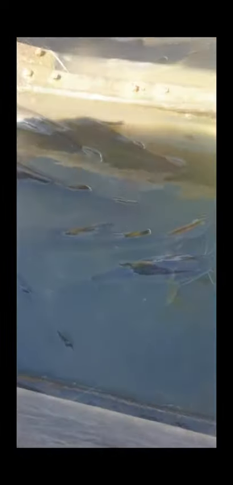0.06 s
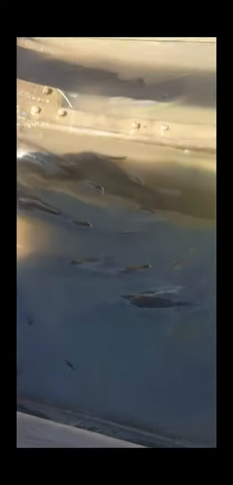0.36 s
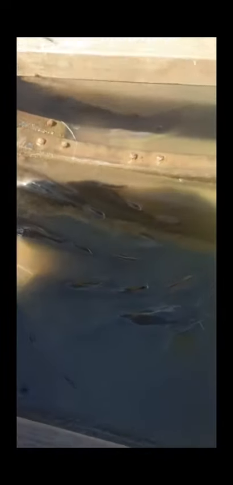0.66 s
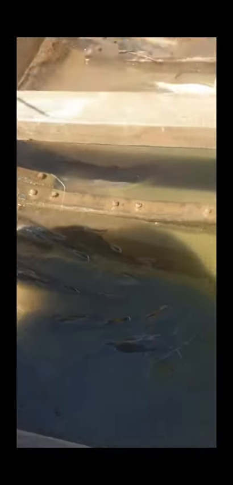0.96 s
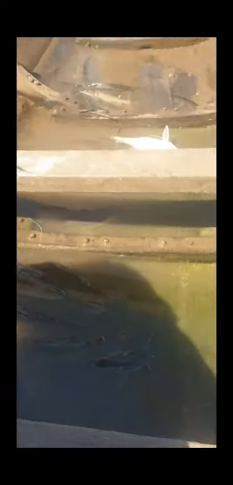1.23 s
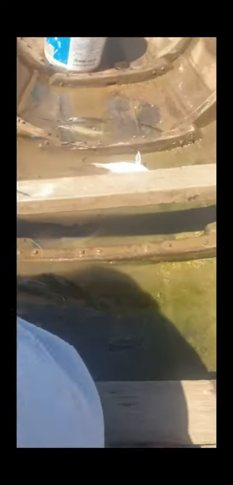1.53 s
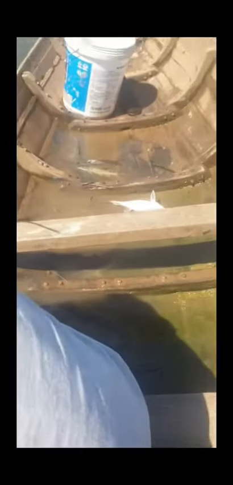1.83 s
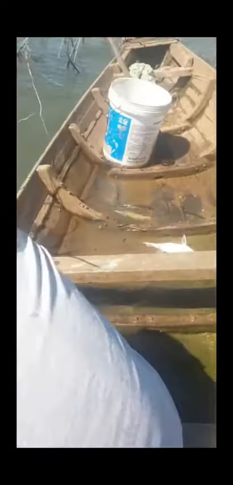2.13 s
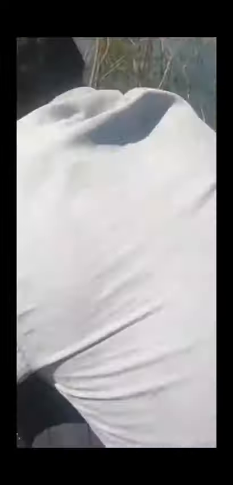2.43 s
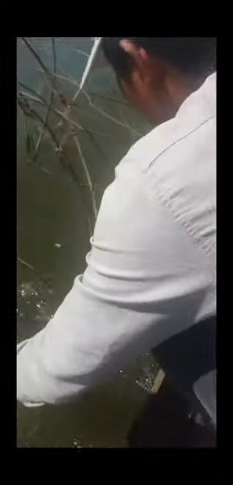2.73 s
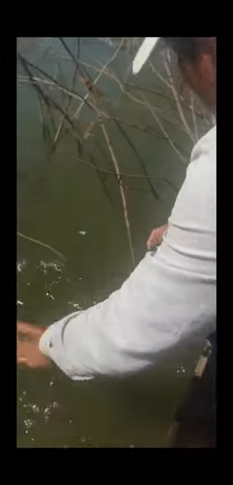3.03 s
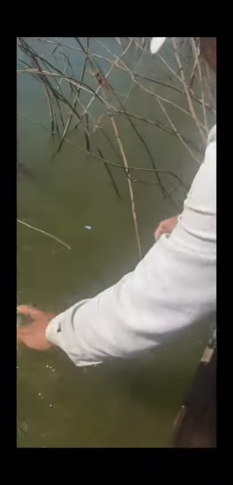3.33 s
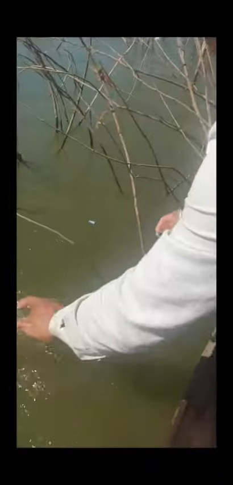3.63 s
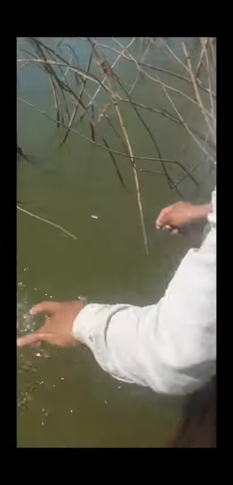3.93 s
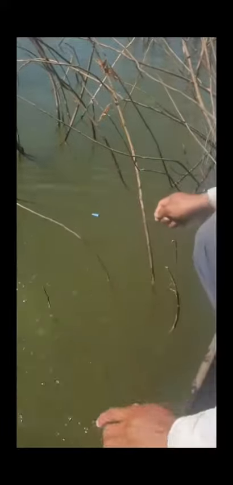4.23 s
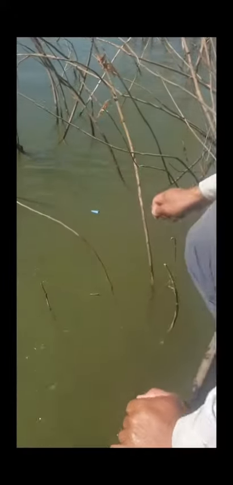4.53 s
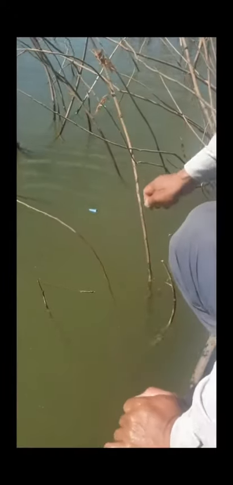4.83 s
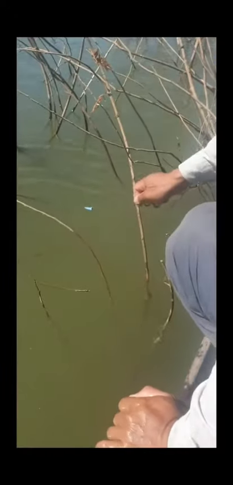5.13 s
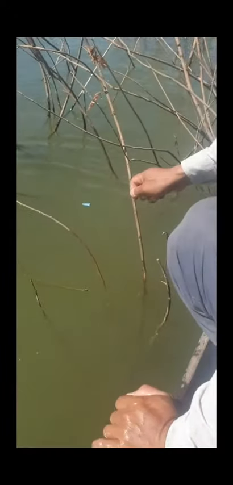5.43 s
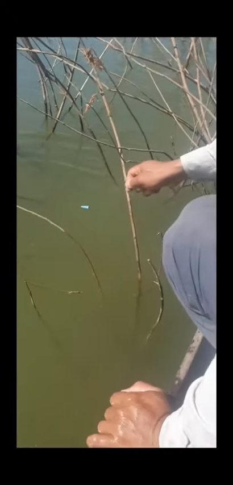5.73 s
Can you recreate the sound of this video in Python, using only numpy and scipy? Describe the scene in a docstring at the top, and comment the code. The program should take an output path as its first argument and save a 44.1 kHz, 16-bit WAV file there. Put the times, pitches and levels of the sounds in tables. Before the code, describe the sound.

Light wind rumbles on a phone microphone throughout, outdoors on a calm lake, with a few brief gusts, strongest around 3 seconds. From about 0.5 seconds water sloshes in the flooded bottom of a wooden boat, gurgling and bubbling with small splashes and a few dry ticks, then easing off by 2.3 seconds. From 2.4 to 3.6 seconds a bare hand slaps the lake surface six times, evenly, about four times a second. These are the loudest sounds, each a sharp wet smack with a hollow plop and a little spray. The churned water soon calms, and small splashes and single bubbles follow. From about 4.5 seconds water trickles faintly back, with a light tick and the soft brush of a sleeve. Scattered quiet drips and plops continue under the wind until nearly 6 seconds.

```python
"""A light wind rumbles on a phone microphone throughout. From 0.5 s water sloshes in the flooded well
of a wooden boat: swarms of ringing bubbles, small splashes, dry ticks. From 2.4 to 3.6 s a bare hand
slaps the lake beside it six times: each a push, a wet smack, a ringing air pocket and spray, leaving
churned water that soon calms. Small splashes and bubbles follow; from 4.5 s water trickles back
and a sleeve brushes past."""
import sys
import numpy as np
from scipy import signal
from scipy.fft import rfft, irfft
from scipy.io import wavfile

SR = 44100
rng = np.random.default_rng(int(sys.argv[2]) if len(sys.argv) > 2 else 0)


def unload_audio(sound):
    """Save the sound as a 16-bit wav file, at the path given as the first command line argument."""
    columns = np.transpose(np.atleast_2d(sound))
    # keep every value between -1 and 1, then stretch to whole-number steps
    steps = np.round(np.clip(columns, -1, 1) * 32767)
    wavfile.write(sys.argv[1], SR, steps.astype(np.int16))


N = 258867

# hand slaps: t/s, contact/s, air pocket/Hz, pocket/dB, push/dB, smack/Hz, smack/dB, spray/dB,
# spray ring/Hz, ring/dB, churn/dB
SLAPS = [(2.4395, 0.004, 230.6, -26, -21.5, 1746, -20.5, -38, 3650, -40, -53.5),
         (2.6684, 0.0029, 285, -24.5, -18, 1730, -16, -35.5, 4690, -25, -55.5),
         (2.9108, 0.003, 266, -25.5, -17, 1657, -17, -29.5, 3480, -33, -56.5),
         (3.143, 0.0061, 211.5, -26.5, -25.5, 1844, -20.5, -27, 4370, -34.5, -58.5),
         (3.363, 0.0078, 223, -33, -32.5, 1707, -18, -31.5, 2540, -26.5, -58),
         (3.5928, 0.0018, 256, -23.5, -35.5, 1620, -19, -38.5, 3550, -40, -64)]
# small splashes: t/s, smack decay/s, plop/dB, smack/Hz, smack/dB, spray/dB
SPLASHES = [(0.579, .006, -52, 1740, -49, -66), (.672, .009, -68, 1640, -47.5, -63),
            (0.722, .014, -63, 1420, -38, -51.5), (0.747, 0.011, -40, 1540, -44.5, -68),
            (.809, 0.022, -37, 1260, -44, -65), (0.918, 0.0054, -31.5, 1730, -42, -48.5),
            (1.016, 0.0019, -38, 2180, -57, -56), (1.09, .005, -33, 2020, -48, -49.5),
            (1.163, 0.011, -39.5, 1980, -43.5, -56), (1.217, 0.0081, -35.5, 2180, -44.5, -53),
            (1.39, .008, -44, 2140, -51, -53), (1.462, .016, -39, 2000, -42.5, -55),
            (1.542, 0.0054, -37, 1750, -39, -42), (1.678, 0.0062, -48, 2170, -63, -41),
            (1.749, .005, -37, 2120, -54, -59), (1.774, .01, -36.5, 2570, -39.5, -50),
            (1.828, 0.0046, -56, 2360, -44.5, -42), (1.908, 0.0036, -55, 2000, -58, -42.5),
            (1.989, 0.0043, -30, 1340, -65, -44), (2.053, 0.02, -36.5, 2120, -64, -38.5),
            (2.202, 0.018, -43, 1020, -38, -66), (2.801, .0065, -55.5, 1810, -55.5, -54),
            (2.832, .005, -52.5, 1480, -51, -58.5), (3.058, 0.0031, -64, 1630, -40, -51),
            (3.126, 0.0053, -41.5, 1800, -41.5, -51.5), (3.339, .003, -58.5, 2080, -48.5, -68.5),
            (3.429, .0057, -35.5, 1650, -41, -48), (3.502, 0.032, -53.5, 1384, -46.5, -72.5),
            (3.634, 0.0039, -43.5, 1735, -32, -58), (3.695, 0.013, -44.5, 1585, -40.5, -51.5),
            (3.972, 0.015, -55, 1800, -53.5, -57.5), (4.236, .012, -50.5, 1810, -54.5, -59.5),
            (4.727, 0.017, -51.5, 1570, -52, -73), (4.8, 0.0029, -45, 1790, -53, -63),
            (4.863, .0097, -53, 1780, -54, -80), (5.245, 0.011, -44, 1700, -45.5, -59),
            (5.518, 0.01, -48, 1790, -47.5, -55.5), (5.81, 0.013, -43, 1654, -45, -56)]
# single bubbles and drips: t/s, starting f/Hz, level/dB
BUBBLES = [(.806, 883, -38.5), (1.080, 857, -32.5), (2.474, 2020, -45), (2.693, 1730, -40.5),
           (3.64, 860, -41), (3.851, 1060, -58), (3.974, 284, -45.5), (4.277, 199, -46), (4.30, 297, -46),
           (4.33, 754, -56), (4.405, 614, -53), (4.505, 665, -54.5), (4.648, 670, -48.5), (4.752, 650, -51),
           (4.864, 302, -47), (4.937, 300, -41), (4.938, 710, -50), (5.325, 326, -55), (5.37, 694, -55.5)]
# slosh in the boat: t/s, gurgle/dB, patter/dB, fizz/dB
SLOSH = [(0.5, -73, -73.1, -71.3), (0.6, -61.5, -56.5, -62.5), (0.76, -49.5, -45.5, -58.5),
         (1.02, -39.5, -50, -55), (1.3, -41, -46.5, -52), (1.43, -45, -52, -59.5), (1.6, -40, -43, -53.5),
         (1.87, -41.5, -48, -55), (2.149, -42.5, -46, -52.5), (2.33, -57.5, -58, -60)]
# water trickling back: start/s, end/s, gurgle/dB, patter/dB, fizz/dB
TRICKLES = [(4.482, 4.58, -60, -67.5, -72), (4.73, 4.942, -58.5, -66.5, -72)]
# offsets to a slap's churn level: gurgle/dB, patter/dB, fizz/dB
CHURN_OFFSET_DB = [2, 1.5, -6.5]
# calming of stirred water: gurgle/(dB/s), patter/(dB/s), fizz/(dB/s)
SETTLE_DB_PER_S = [46, 43, 21.5]
# calm lake: gurgle/dB, patter/dB, fizz/dB
LAPPING_DB = [-74, -79, -82.5]
# dry ticks: t/s, f/Hz, width/Hz, level/dB
TICKS = [(1.016, 800, 900, -41.5), (1.217, 700, 900, -46), (1.542, 1750, 700, -40.5),
         (1.913, 7000, 5040, -48.5), (1.988, 880, 910, -41.5), (2.798, 5050, 1100, -47.5),
         (4.019, 700, 900, -58), (4.4745, 1540, 1110, -45.5), (4.480, 1400, 896, -47),
         (5.455, 4230, 4010, -75.5), (5.69, 4940, 4100, -77)]
# sleeve strokes: t/s, decay/s, f/Hz, level/dB
SWISHES = [(4.518, .012, 6300, -59), (4.534, 0.0037, 5900, -55), (4.545, 0.0027, 5600, -54),
           (4.565, 0.027, 5100, -59.5), (4.834, 0.0015, 5170, -66)]
# wind on the microphone: t/s, level/dB
WIND = [(0, -50), (0.18, -46), (0.52, -54.1), (0.68, -50.5), (0.87, -51), (1.4, -44.5), (1.55, -49),
        (1.85, -46), (2.28, -57.5), (2.5, -52), (2.92, -40.5), (3.27, -56.5), (3.4, -45), (3.85, -57.5),
        (4.15, -52), (4.95, -50), (5.38, -52.5), (5.87, -47.5)]
# gusts: t/s, f/Hz, half length/s, level/dB
BUFFETS = [(.69, 69.5, 0.028, -36.5), (2.818, 102, 0.019, -41), (2.955, 130, 0.02, -29),
           (2.958, 54, 0.045, -28), (2.992, 136.5, 0.028, -29.5), (3.371, 133, .007, -31.5),
           (3.385, 95, .016, -32.5), (3.442, 99, 0.023, -40), (4.906, 106, .0094, -34),
           (5.151, 72.7, 0.024, -37.5), (5.777, 128.6, 0.0059, -35), (5.845, 83.6, 0.023, -38)]
# spectra of push, spray, plop, slosh and wind: f/Hz, relative density/dB
PUSH_SPECTRUM = [(150, -32.5), (230, -17), (320, -1.5), (450, 3), (640, 3.5), (800, -3), (980, -9),
                 (1300, -4.5), (1800, -26.5)]
SPRAY_SPECTRUM = [(1500, -38), (2400, 2), (3000, -15), (3700, 1.5), (4900, -2), (5800, -7), (7500, -6.5),
                  (9800, -13.5)]
PLOP_SPECTRUM = [(150, -16.5), (300, 6), (500, -6), (780, 3.5), (950, -2.5), (1150, -23), (1500, -28.5)]
SLOSH_SPECTRUM = [(150, -11.5), (230, -1), (400, 2.5), (530, -0.5), (700, -2.5), (880, -8), (1150, -17.5),
                  (1600, -22), (2100, -19), (3000, -23), (3500, -23.5), (4500, -20), (6000, -21),
                  (7000, -27), (10000, -29)]
WIND_SPECTRUM = [(20, -15.5), (32, -10), (50, -2.5), (80, -0.5), (115, -6.5), (160, -13.5), (220, -19),
                 (320, -25.5), (600, -34)]
# open-air tail: f/Hz, T60/s
TAIL_T60 = [(200, 0.12), (1000, 0.086), (3000, 0.083), (9000, 0.12)]


def slaps():
    """The palm pushes the surface, squeezes out air, leaves a ringing pocket and throws spray."""
    out, lead_s = np.zeros(N), .02
    t = np.arange(8192) / SR - lead_s
    for (at_s, contact_s, pocket_hz, pocket_db, push_db, smack_hz, smack_db,
         spray_db, ring_hz, ring_db, _) in SLAPS:
        blow = -np.exp(-(t / .0001) ** 2)  # the flat hand lands at once
        shove = burst(t, .0016, 4 * contact_s)
        push = shaped(at_level(blow, 0) + at_level(shove, -.8), PUSH_SPECTRUM)
        crack = at_level(resonate(blow, smack_hz, 800), -15) + at_level(smack(t, smack_hz, contact_s), 0)
        drops = slap_spray(t, contact_s)
        ring = resonate(burst(t, .0014, contact_s), ring_hz, 610, 900)
        impact = at_level(push, push_db) + at_level(crack, smack_db)
        add(out, at_s - lead_s, impact + at_level(drops, spray_db) + at_level(ring, ring_db))
        add(out, at_s, at_level(bubble(pocket_hz, rise_oct=.087, cycles=3), pocket_db))
    return out


def slap_spray(t, contact_s):
    """A sheet of water tears and closes again; the fingers shed tiny bubbles."""
    tear = burst(t, .0017, 1.4 * contact_s)
    close = gain(-24) * burst(t - .022, .0042, .0035)
    grain = gain(2.5 * rng.standard_normal(len(t)))
    out = at_level(shaped((tear + close) * grain, SPRAY_SPECTRUM), 0)
    for hz, delay_s, cycles in rng.uniform([2000, 0, 8], [6500, .03, 22], (10, 3)):
        add(out, delay_s - t[0], at_level(bubble(hz, .0032, cycles), -13 - 300 * delay_s))
    return out


def smack(t, hz, decay_s):
    """Air squeezed from the closing gap rings in a broad resonance and a weaker one on each side."""
    rise_s = min(.4 * decay_s, .0015)  # short contacts crack sharply
    puff = burst(t + .0002, rise_s, decay_s)  # just before the surfaces meet
    centre = resonate(puff, hz, 210, 650)
    below = resonate(puff, .76 * hz, 300, 820)
    above = resonate(puff, 1.22 * hz, 210, 900)
    return at_level(centre, 0) + at_level(below, -14.5) + at_level(above, -9.5)


def bubble(hz, rise_oct, cycles):
    """Trapped air rings, rising in pitch near the surface; rise_oct and cycles are per decay time."""
    decay_s = cycles / hz
    age = np.arange(int(6 * decay_s * SR)) / SR / decay_s
    turns = np.cumsum(hz * 2 ** (rise_oct * age)) / SR
    return np.sin(2 * np.pi * turns) * np.exp(-age) * (1 - np.exp(-age / .28))


def splashes():
    """Falling water and wavelets: soft plop, smack, short sizzle; single bubbles ring."""
    out, lead_s = np.zeros(N), .02
    t = np.arange(8192) / SR - lead_s
    for at_s, decay_s, plop_db, smack_hz, smack_db, spray_db in SPLASHES:
        plop = at_level(shaped(burst(t, .00047, .89 * decay_s), PLOP_SPECTRUM), plop_db)
        spray = at_level(shaped(burst(t, .0025, 3 * decay_s), SPRAY_SPECTRUM), spray_db)
        add(out, at_s - lead_s, plop + at_level(smack(t, smack_hz, decay_s), smack_db) + spray)
    for at_s, hz, db in BUBBLES:
        rise_oct = .11 * (300 / hz) ** .7  # big bubbles glide further
        add(out, at_s, at_level(bubble(hz, rise_oct, cycles=4.2), db))
    return out


def water():
    """Large bubbles gurgle, drops patter, fine foam fizzes."""
    gurgle, patter, fizz = stirring()
    glug = gurgle * (gurgle / gain(-36.5)) ** .52  # only a hard slosh traps the biggest bubbles
    return (glug * swarm(190, 500, per_s=150, cycles=4.9, spread_db=.5, wash_db=-15, clump_db=5.5)
            + gurgle * swarm(540, 1120, per_s=240, cycles=3.7, spread_db=2.5, wash_db=-14, clump_db=2.5)
            + patter * swarm(1200, 3500, per_s=600, cycles=12, spread_db=2.5, wash_db=-2.5, clump_db=2)
            + fizz * swarm(3500, 10000, per_s=2500, cycles=12, spread_db=5, wash_db=0, clump_db=2))


def stirring():
    """Gurgle, patter and fizz gains: calm lake, slosh, slap churn and trickles add in power."""
    layers = []
    for k, slosh in enumerate(gain_curves(SLOSH)):
        settle = SETTLE_DB_PER_S[k]
        parts = [gain(LAPPING_DB[k]), slosh * held(SLOSH[0][0], SLOSH[-1][0], settle, settle)]
        for at_s, *_, churn_db in SLAPS:
            parts.append(gain(churn_db + CHURN_OFFSET_DB[k]) * held(at_s, at_s, 400, settle))
        for start_s, end_s, *db in TRICKLES:
            parts.append(gain(db[k]) * held(start_s, end_s, rise_db_per_s=71, fall_db_per_s=93))
        layers.append(np.sqrt(sum(part ** 2 for part in parts)))
    return layers


def swarm(lo_hz, hi_hz, per_s, cycles, spread_db, wash_db, clump_db):
    """Bubbles of one size range over a wash of turbulence, swelling in clumps."""
    clumps = gain(clump_db * np.tanh(band_noise(11, 23)))
    bubbles, pitches_hz = np.zeros(N), np.geomspace(lo_hz, hi_hz, 40)
    for hz in pitches_hz:
        share = hz / pitches_hz.sum()  # small bubbles are the most numerous
        births = (rng.random(N) < per_s * share / SR) * rng.choice([-1, 1], N)
        strengths = gain(spread_db * np.minimum(rng.exponential(1, N), 3))
        detune = rng.uniform(.93, 1.03)
        ring = bubble(hz * detune, rng.uniform(0, .08), cycles * detune * rng.uniform(.28, 2.9))
        bubbles += signal.oaconvolve(births * strengths, at_level(ring, 0))[:N]
    wash = gain(wash_db) * band_noise(lo_hz, hi_hz)
    return unit_rms(shaped((unit_rms(bubbles) + wash) * clumps, SLOSH_SPECTRUM))


def ticks():
    """An impulse rings one broad, quickly dying resonance."""
    out, impulse = np.zeros(N), signal.unit_impulse(2048)
    for at_s, hz, width_hz, db in TICKS:
        ring = resonate(impulse, hz, width_hz, 2 * width_hz)
        add(out, at_s, at_level(bandpass(ring, 450, 10000), db))
    return out


def sleeve():
    """Cloth brushes in short bright strokes."""
    out, lead_s = np.zeros(N), .04
    t = np.arange(8192) / SR - lead_s
    for at_s, decay_s, hz, db in SWISHES:
        stroke = resonate(burst(t, .68 * decay_s, decay_s), hz, 1200)
        add(out, at_s - lead_s, at_level(stroke, db))
    return out


def wind():
    """Lumpy rumble on the microphone; sharper buffets break up into turbulence."""
    lumps = gain(2 * np.tanh(band_noise(4, 46)))
    out = gain_curves(WIND)[0] * unit_rms(shaped(rng.standard_normal(N) * lumps, WIND_SPECTRUM))
    for at_s, hz, half_s, db in BUFFETS:
        t = np.arange(-3 * half_s, 3 * half_s, 1 / SR)
        eddy = np.cos(2 * np.pi * (hz * t * (1 - .047 * t / half_s) + rng.random()))
        turbulence = gain(-8.5) * band_noise(.83 * hz, 2.1 * hz, SR)[-len(t):]
        add(out, at_s + t[0], at_level((eddy + turbulence) * np.exp(-(t / half_s) ** 2), db))
    return out


def outdoors(x):
    """Adds a thin scattered tail and one faint nearby echo."""
    taps = rng.standard_normal(SR // 2) * (rng.random(SR // 2) < .1)
    hz, t, spectra = signal.stft(taps, SR, nperseg=256)
    fade = gain(-60 * t / log_interp(TAIL_T60, hz)[:, None])
    _, tail = signal.istft(spectra * fade, SR, nperseg=256)
    out = x + gain(-22) * signal.fftconvolve(x, tail / np.linalg.norm(tail))[:N]
    add(out, .025, gain(-23.5) * bandpass(x, 1900, 6500))
    return out


def gain(db):
    return 10 ** (np.asarray(db) / 20)


def unit_rms(x):
    return x / np.sqrt(np.mean(x ** 2) + 1e-20)


def at_level(x, db):
    """Scales to the energy of 10 ms at this level."""
    return gain(db) * x / np.sqrt(np.sum(x ** 2) / (SR / 100) + 1e-20)


def log_interp(table, hz):
    table_hz, values = np.transpose(table)
    return np.interp(np.log(hz + 1), np.log(table_hz + 1), values)


def gain_curves(table):
    """One curve per dB column."""
    times_s, *columns_db = np.transpose(table)
    return [gain(np.interp(np.arange(N) / SR, times_s, db)) for db in columns_db]


def held(start_s, end_s, rise_db_per_s, fall_db_per_s):
    """Envelope: swells to start_s, holds to end_s, dies away."""
    t = np.arange(N) / SR
    return gain(-rise_db_per_s * np.maximum(start_s - t, 0) - fall_db_per_s * np.maximum(t - end_s, 0))


def add(mix, at_s, sound):
    part = mix[max(round(at_s * SR), 0):][:len(sound)]
    part += sound[:len(part)]


def shaped(x, spectrum):
    """Filters by a spectrum, 24 dB/octave roll-off beyond its ends."""
    hz = np.fft.rfftfreq(len(x), 1 / SR) + 1
    skirts = np.minimum(1, np.minimum(hz / spectrum[0][0], spectrum[-1][0] / hz)) ** 4
    return irfft(rfft(x) * gain(log_interp(spectrum, hz)) * skirts, len(x))


def bandpass(x, lo_hz, hi_hz):
    return signal.sosfilt(signal.butter(3, [lo_hz, hi_hz], "band", fs=SR, output="sos"), x)


def band_noise(lo_hz, hi_hz, samples=N):
    return unit_rms(bandpass(rng.standard_normal(samples), lo_hz, hi_hz))


def resonate(x, hz, *widths_hz):
    """Two-pole resonances in series, one per width."""
    for width_hz in widths_hz:
        x = signal.lfilter(*signal.iirpeak(hz, hz / width_hz, SR), x)
    return x


def burst(t, rise_s, decay_s):
    """Noise peaking at t = 0."""
    return rng.standard_normal(len(t)) * np.exp(np.minimum(t / rise_s, -t / decay_s))


def scene():
    """Mono mix; only slaps, splashes and ticks echo."""
    return (outdoors(slaps() + splashes() + ticks()) + water() + sleeve() + wind())[None]


def record(dry):
    """The highest peaks are rounded off softly, and the phone limits the band."""
    ceiling, cutoff_hz = .93, 10150
    limited = dry / (1 + (dry / ceiling) ** 8) ** (1 / 8)
    lowpass = signal.firwin(255, cutoff_hz, window=("kaiser", 7), fs=SR)
    return signal.oaconvolve(limited, lowpass[None], "same")


dry = scene()
out = record(dry)
unload_audio(out)
```